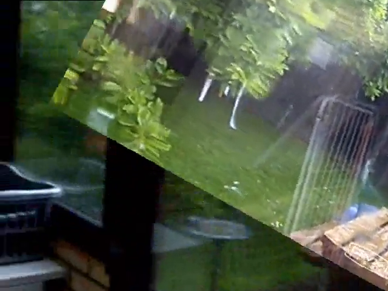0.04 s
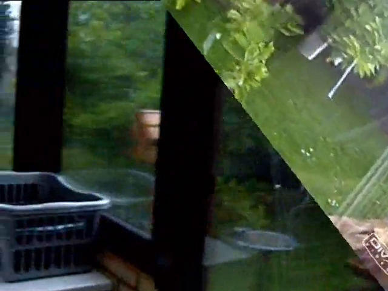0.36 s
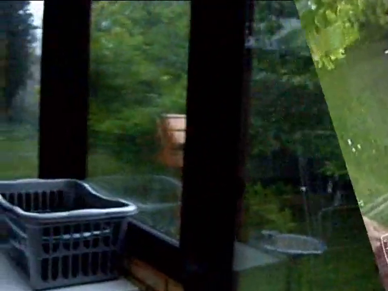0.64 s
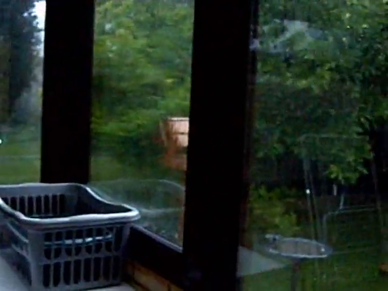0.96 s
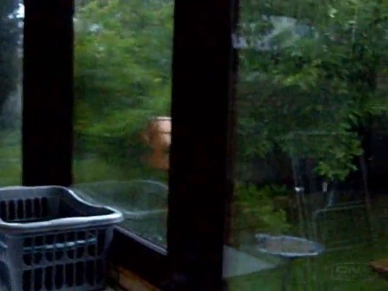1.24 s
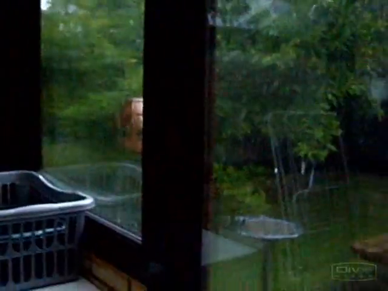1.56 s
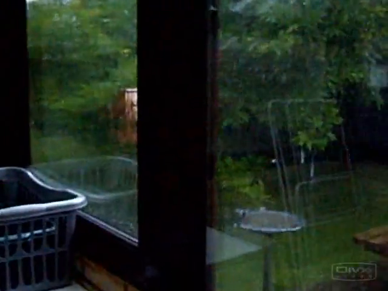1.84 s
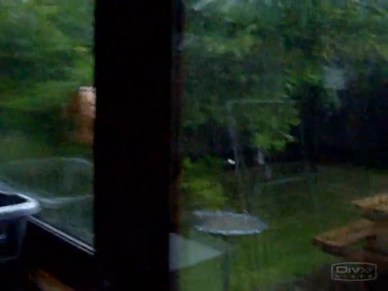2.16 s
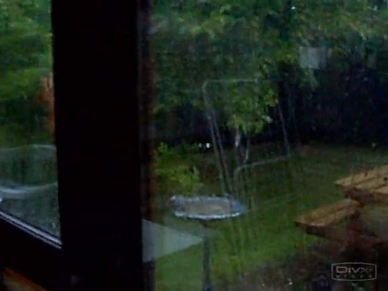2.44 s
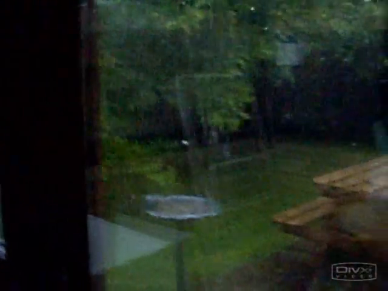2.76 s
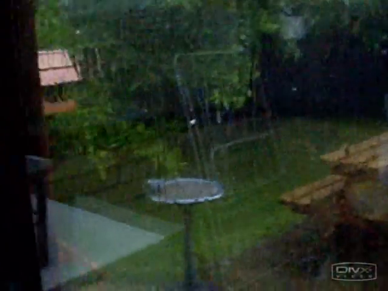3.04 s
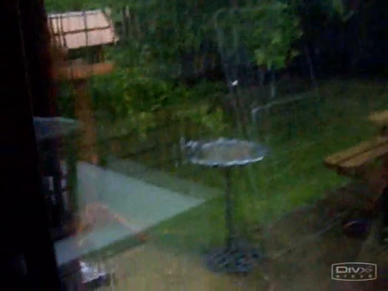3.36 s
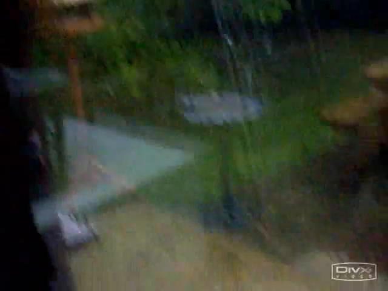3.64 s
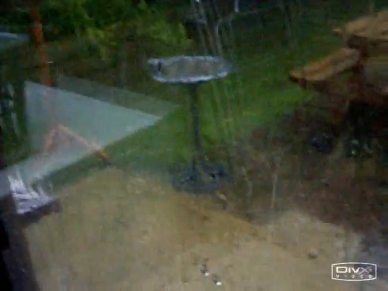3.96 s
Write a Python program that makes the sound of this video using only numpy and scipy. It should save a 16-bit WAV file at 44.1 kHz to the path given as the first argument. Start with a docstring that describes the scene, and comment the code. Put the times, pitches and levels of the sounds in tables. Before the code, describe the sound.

Heavy rain on a garden, heard from a glazed porch. Soft rain fades, then a downpour cuts in with hissing splashes, close drops and low roof drumming. A few deep bumps hit the small microphone.

```python
"""Heavy rain on a garden, heard from a glazed porch through a small camera.
Quieter rain fades away, then the downpour cuts in: a wash of far drops, near drops that pat, slap
and plink on standing water, a few heavy drops, and the low drumming of the porch under its roof.
A hand bumps the camera, whose narrow-band recorder notches the treble and rounds off the peaks."""
import sys
import numpy as np
from scipy import signal
from scipy.fft import rfft, irfft
from scipy.io import wavfile
from scipy.ndimage import uniform_filter1d

SR = 44100
rng = np.random.default_rng(int(sys.argv[2]) if len(sys.argv) > 2 else 0)


def pcm_store(signal):
    """Save signal as 16-bit PCM."""
    levels = np.round(np.clip(np.atleast_2d(signal), -1, 1) * 32767)
    wavfile.write(sys.argv[1], SR, levels.astype(np.int16).T)


N = 176400
T = np.arange(N) / SR
CUT_S, CUT_RISE_S = .79, .0035   # the downpour cuts in
PATS_PER_S, PAT_SPREAD_DB = 2200, 2
# bright spectrum of splashing water: f/Hz, level/dB
SPLASH_SPECTRUM = [(400, -25.5), (1300, -16.5), (1900, -5.5), (2400, -3.5), (2850, 1), (3400, -3),
                   (4100, -5.5), (4800, -10.5), (5400, -13), (6000, -13.5)]


def from_db(db):
    """Decibels to gain."""
    return 10 ** (np.asarray(db) / 20)


def rms_one(x):
    """Scale to rms 1."""
    return x / np.sqrt(np.mean(x ** 2) + 1e-20)


def envelope(rows):
    """Gain at every sample from rows of t/s, level/dB."""
    return from_db(np.interp(T, *np.transpose(rows)))


def drift(hz):
    """Smooth random wander with a spread of about 1."""
    hop, settle = 40, 2000
    pole = np.exp(-2 * np.pi * hz * hop / SR)
    noise = rng.standard_normal(N // hop + settle + 2)
    slow = signal.lfilter([1], [1, -2 * pole, pole * pole], noise)[settle:]
    return np.interp(np.arange(N) / hop, np.arange(len(slow)), rms_one(slow))


def colour(x, spectrum, size=8192):
    """Minimum-phase EQ that keeps attacks sharp; output at rms 1."""
    hz, db = np.transpose(spectrum)
    bin_hz = np.maximum(np.arange(size // 2 + 1) * SR / size, 1)
    gain = from_db(np.interp(np.log(bin_hz), np.log(hz), db))
    cepstrum = irfft(np.log(gain))
    response = irfft(np.exp(rfft(2 * cepstrum[:size // 2], size)))
    return rms_one(signal.fftconvolve(x, response)[:N])


def ring(clicks, hz, t60):
    """Each click sets a decaying sine of its own height ringing."""
    pole, angle = from_db(-60 / (t60 * SR)), 2 * np.pi * hz / SR
    return signal.lfilter([0, np.sin(angle)], [1, -2 * pole * np.cos(angle), pole * pole], clicks + 1e-18)


def drops(per_s, spread_db):
    """Impacts at random moments: many small, a few large."""
    sizes = from_db(spread_db * np.minimum(rng.exponential(1, N), 5))
    return sizes * rng.choice([-1, 1], N) * (rng.random(N) < per_s / SR)


def slaps(per_s=600, decay_s=.0017):
    """Near drops burst, each into a tiny puff of spray."""
    hits = drops(per_s, spread_db=2)
    energy = signal.lfilter([1], [1, -np.exp(-2 / (decay_s * SR))], hits ** 2 + 1e-18)
    return rms_one(np.sqrt(energy) * rng.standard_normal(N))


def quiet_rain():
    """A soft bed of slaps and hiss that fades away."""
    # fade-out of the soft rain: t/s, level/dB
    fade = [(0, -31), (.12, -32.5), (.36, -36), (.6, -39.5), (.78, -45)]
    # its tone colour: f/Hz, level/dB
    spectrum = [(30, -11), (70, -2), (120, 4.5), (200, -2), (700, -2.5), (1500, -11), (2200, -5),
                (2900, -1), (3500, -2.5), (4600, -11), (6000, -17)]
    return from_db(2) * envelope(fade) * colour(slaps() + rng.standard_normal(N), spectrum)


def porch_drumming(low_cut_hz=70):
    """Rain on the roof drums the porch's low resonances; their balance shifts as the camera moves."""
    # porch resonances: f/Hz, width/Hz, level at the cut/dB, level at the end/dB
    modes = [(90, 7.1, -22.5, -30), (150.5, 12, -30.5, -28), (194, 20, -41, -27), (259, 31, -39, -25)]
    hits = drops(PATS_PER_S, PAT_SPREAD_DB)
    drumming = np.zeros(N)
    for hz, width, first_db, last_db in modes:
        mode = rms_one(ring(hits, hz, t60=np.log(1000) / (np.pi * width)))
        drumming += envelope([(CUT_S, first_db), (T[-1], last_db)]) * mode
    return signal.sosfilt(signal.butter(4, low_cut_hz, "high", fs=SR, output="sos"), drumming)


def camera_bumps():
    """The hand knocks the camera: deep, quickly dying thumps."""
    # knocks on the camera body: t/s, f/Hz, level/dB, t60/s
    knocks = [(.87, 16, -6.5, .12), (1.876, 28, -5.5, .36), (2.13, 21, -15, 0.52)]
    return sum(ring(-from_db(db) * (np.arange(N) == int(s * SR)), hz, t60) for s, hz, db, t60 in knocks)


def big_drops(decay_s=.005):
    """Single heavy drops land close by, each a short burst of spray."""
    # heavy drop landings: t/s, level/dB
    landings = [(2.6996, 5), (2.9, -3), (3.3936, 3), (3.5694, 3), (3.6661, 2), (3.9324, -4)]
    bursts = sum(from_db(db - 11) * (T >= s) * np.exp(-np.abs(T - s) / decay_s) for s, db in landings)
    return bursts * colour(rng.standard_normal(N), SPLASH_SPECTRUM)


def plinks(count=16, low_hz=2293, high_hz=3660, cycles=25):
    """Drops on standing water ring briefly, each at one of a set of pitches."""
    hits = drops(per_s=350, spread_db=2)
    pitch_index = rng.integers(0, count, N)
    pitches = np.geomspace(low_hz, high_hz, count)
    return rms_one(sum(ring(hits * (pitch_index == k), hz, cycles / hz) for k, hz in enumerate(pitches)))


def downpour(pat_share=.67):
    """Dull pats, bright slaps and plinks over the wash of far rain, in slight, quick surges."""
    # dull spectrum of the patter: f/Hz, level/dB
    body_spectrum = [(20, -2), (55, -16), (80, -5.5), (250, -2), (400, -2.5), (750, -3), (1100, -7),
                     (1500, -8), (2300, -12.5), (5000, -29)]
    # envelope of the dull patter: t/s, level/dB
    body_levels = [(.8, -18), (1.1, -15), (1.45, -16.5), (1.85, -15.5), (2.4, -16.5), (3.05, -19),
                   (3.55, -21), (4, -19)]
    # envelope of the bright splashing: t/s, level/dB
    splash_levels = [(0.81, -13.5), (0.85, -11), (0.86, -18.5), (0.88, -12.5), (1.11, -11), (1.26, -13),
                     (1.27, -9.5), (1.31, -13), (1.33, -9.5), (1.48, -14.5), (1.53, -11.5), (2.12, -11.5),
                     (3.06, -14.5), (3.08, -10), (3.1, -13.5), (3.17, -14.5), (3.38, -16.5), (3.4, -14),
                     (3.45, -17.5), (3.57, -15.5), (3.6, -17), (3.68, -14.5), (3.72, -19), (3.81, -14),
                     (3.86, -15), (3.92, -12.5), (3.97, -16), (3.99, -13)]
    surge = from_db(.53 * drift(hz=16))
    near = slaps()
    pats = rms_one(drops(PATS_PER_S, PAT_SPREAD_DB))
    body = colour(np.sqrt(pat_share) * pats + np.sqrt(1 - pat_share) * near, body_spectrum)
    far_wash = colour(rng.standard_normal(N), SPLASH_SPECTRUM)
    splash = far_wash + from_db(-1.5) * colour(near, SPLASH_SPECTRUM) + from_db(-6.5) * plinks()
    body *= from_db(2) * envelope(body_levels) * np.sqrt(surge)
    splash *= envelope(splash_levels) * surge
    return body + splash


def scene():
    """The quiet rain gives way at once to the downpour."""
    cut = np.clip((T - CUT_S) / CUT_RISE_S, 0, 1)
    rain = (1 - cut) * quiet_rain() + cut * (downpour() + porch_drumming())
    return (rain + big_drops() + camera_bumps())[None]


def record(dry):
    """A notched, narrow band; peaks overload; the low sampling rate adds mirrored treble and grit."""
    recorder_hz, cutoff_hz = 12050, 15520
    notch_hz, notch_width_hz = 3758, 479
    sides_hz = np.array([-.5, .5]) * notch_width_hz
    notch = signal.butter(4, notch_hz + sides_hz, "bandstop", fs=SR, output="sos")
    lowpass = signal.ellip(10, .3, 70, recorder_hz / 2, fs=SR, output="sos")
    narrow = signal.sosfilt(notch, signal.sosfilt(lowpass, dry))
    clipped = narrow / (1 + narrow ** 8) ** (1 / 8)   # soft ceiling at full scale
    slope = np.gradient(clipped, axis=-1) * SR / recorder_hz
    images = from_db(-19.5) * slope * np.cos(2 * np.pi * recorder_hz * T)
    running_rms = np.sqrt(np.abs(uniform_filter1d(clipped ** 2, size=200)))
    grit = from_db(-20) * running_rms * rng.standard_normal(N)
    # clear the middle of the notch and the very top, grit included
    final_eq = signal.firwin(1201, [*(notch_hz + sides_hz / 2), cutoff_hz], fs=SR)
    return signal.fftconvolve(clipped + images + grit, final_eq[None], "same")


dry = scene()
out = record(dry)
pcm_store(out)
```